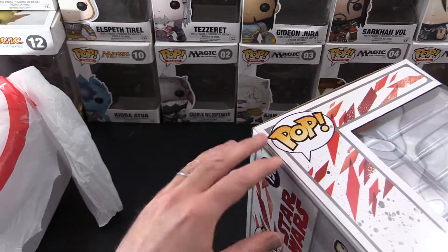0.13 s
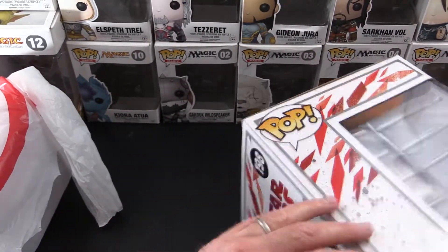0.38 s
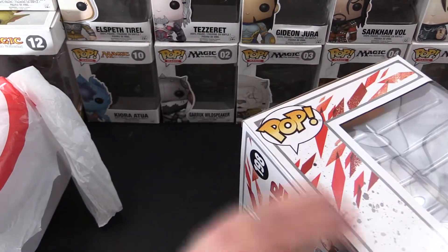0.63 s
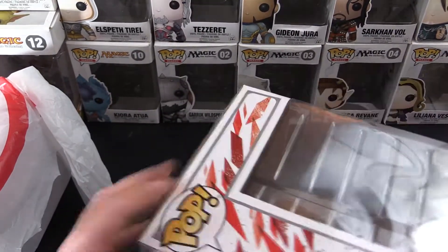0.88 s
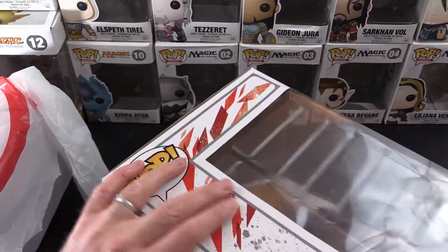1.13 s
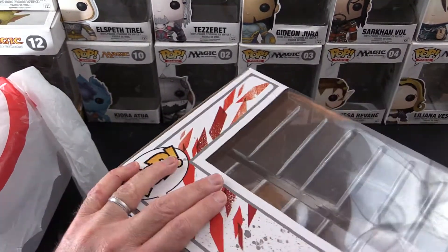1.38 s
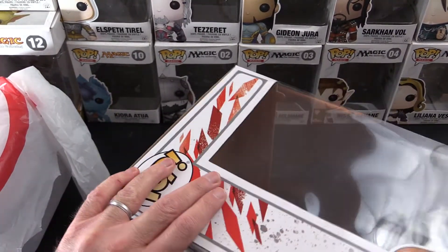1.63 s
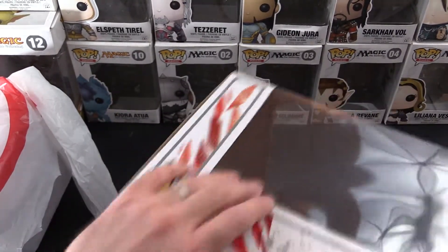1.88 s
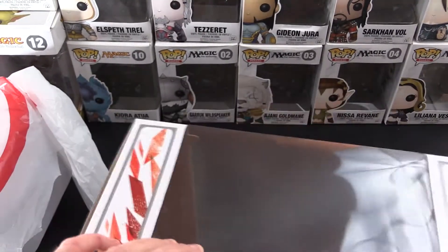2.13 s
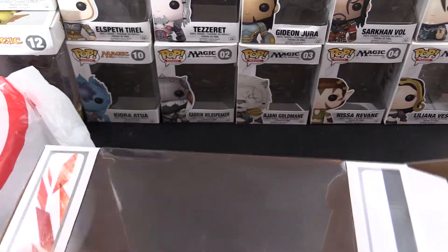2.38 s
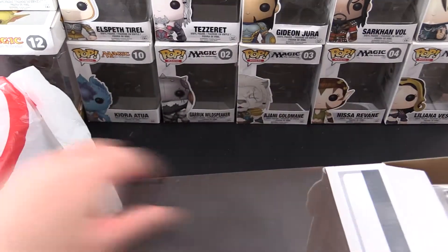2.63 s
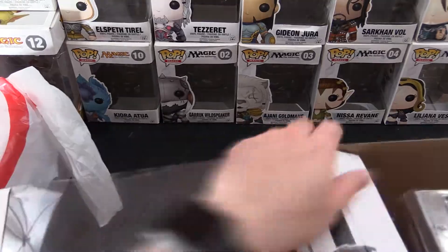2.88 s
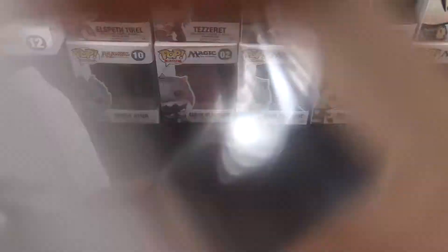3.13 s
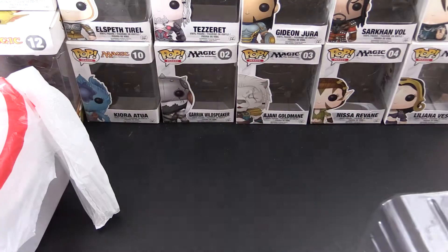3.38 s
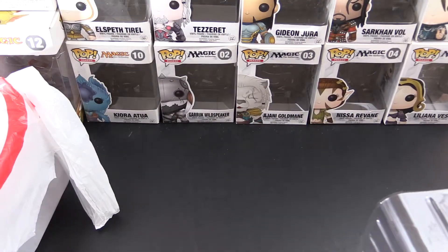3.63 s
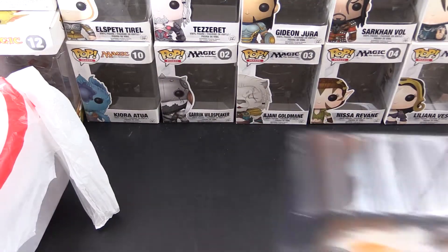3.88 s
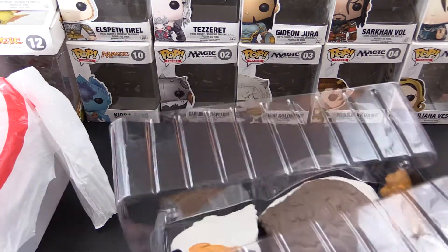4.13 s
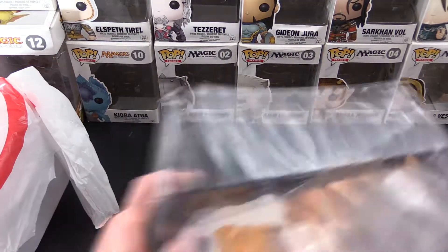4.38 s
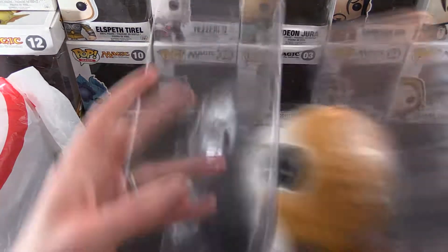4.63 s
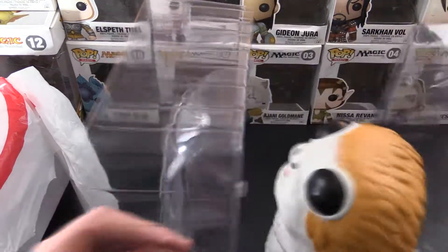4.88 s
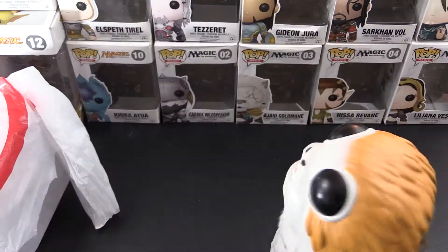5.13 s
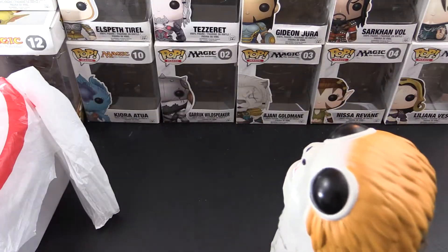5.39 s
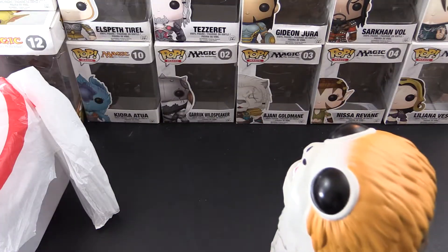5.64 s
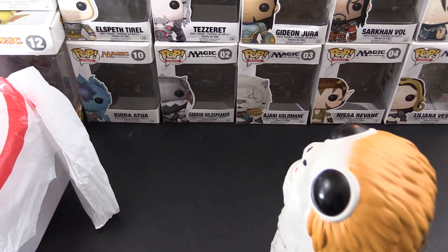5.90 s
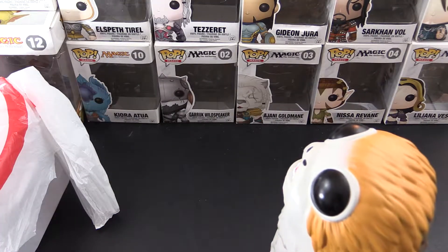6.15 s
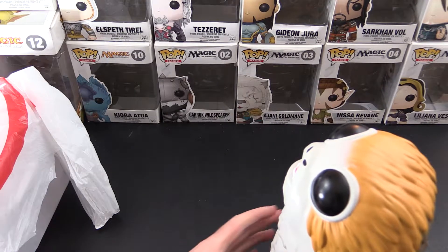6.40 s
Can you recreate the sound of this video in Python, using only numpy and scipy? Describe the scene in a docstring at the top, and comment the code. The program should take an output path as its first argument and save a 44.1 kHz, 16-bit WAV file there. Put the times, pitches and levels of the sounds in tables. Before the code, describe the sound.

Close up in a small quiet room, hands work a hollow cardboard box and thin clear plastic on a table. Light crinkles grow into loud crackles, scrapes and boxy knocks, ease briefly, then the plastic tray rattles and snaps sharply. A few small ticks and one crisp knock follow, leaving faint hiss and hum.

```python
"""Thin plastic crinkles and hollow cardboard rubs and knocks: a box and its clear tray handled on a table, heard
speeded up. Each short snatch is grainy friction noise rung at its own pitch and faded in and out; plastic adds
hiss and sudden snaps, cardboard adds a clear note, and the table adds dull thuds.
Underneath are the slide of the tray and box, as steady friction noise, and a faint room hiss and hum."""
import sys
import numpy as np
from scipy import signal
from scipy.fft import rfft, irfft, next_fast_len
from scipy.io import wavfile

SR = 44100
rng = np.random.default_rng(int(sys.argv[2]) if len(sys.argv) > 2 else 0)


def nominal_scale(level):
    """Amplitude ratio for a level in decibels (scalar or array-like)."""
    x = np.asarray(level, float) / 20
    return 10 ** x


def generate_wav(signal):
    """Clip the signal to [-1, 1] and save it as 16-bit WAV at the path in sys.argv[1]."""
    frames = np.transpose(np.atleast_2d(signal))
    scaled = np.clip(frames, -1, 1) * 32767
    pcm = np.round(scaled).astype(np.int16)
    wavfile.write(sys.argv[1], SR, pcm)


N = 287566   # samples, about 6.5 s

# Colour of the friction before each material rings. Each row: frequency in Hz, relative density in dB per Hz.
FRICTION_COLOUR = [(18, -56), (30, -6), (233, 2.5), (512, -3.5), (822, -7), (988, -8.5), (1860, -11),
                   (2010, -11.5), (3580, -16), (10200, -29.5), (16000, -41.5)]
# Sudden snaps and taps of the plastic. Each row: start in seconds, starting level in dB, ring in Hz.
SNAP_EVENTS = [(0.323,-38,1800),(.604,-30,2200),(.95,-48,3500),(1.094,-20.5,754),(1.276,-24,730),(1.303,-29,910),(1.374,-30.5,1730),(1.516,-32.5,720),(1.804,-32,800),(2.394,-31,950),(2.762,-24.5,1210),(2.988,-28.5,1760),(3.234,-30,1920),(3.323,-31.5,766),(3.964,-22.5,940),(4.147,-54,2500),(4.22,-38,617),(4.337,-41.5,990),(4.451,-34,1350),(4.517,-28,1360),(4.606,-22,910),(4.659,-30,1800),(5.117,-20,830),(5.464,-60,1510),(5.628,-29,780),(5.73,-39,627),(5.929,-41,776)]
RISE_SHARE = 0.51   # share of a snatch's length spent fading in


def at_hz(points, hz):
    """Reads a spectrum curve between its points on a logarithmic frequency scale."""
    point_hz, value = np.transpose(points)
    return np.interp(np.log(hz + 1), np.log(point_hz), value)


def rms_one(x):
    """Brings the whole signal to an rms of 1."""
    return x / np.sqrt(np.mean(x ** 2) + 1e-20)


def in_time(rows):
    """Draws straight lines through timed rows, giving one curve for each column after the seconds."""
    s, *columns = np.transpose(rows)
    return [np.interp(np.arange(N) / SR, s, c) for c in columns]


def band(x, low_hz, high_hz):
    """Keeps one frequency band and levels it to rms 1."""
    sos = signal.butter(3, [low_hz, high_hz], "band", fs=SR, output="sos")
    return rms_one(signal.sosfilt(sos, x))


def resonate(x, hz, width_hz):
    """One damped mode: a two-pole resonator; the wider it is, the sooner it dies away."""
    r = np.exp(-np.pi * width_hz / SR)
    poles = [1, -2 * r * np.cos(2 * np.pi * hz / SR), r * r]
    return signal.lfilter([1, 0, -1], poles, x) * (1 - r * r) / 2


def grains(per_s, uneven_db, smooth):
    """Tiny buckling clicks of uneven size over smooth friction noise, as two unrelated streams."""
    excess = np.minimum(rng.exponential(1, (2, N)), 4)
    sizes = nominal_scale(uneven_db * excess) * rng.choice([-1, 1], (2, N))
    clicks = rms_one(sizes * (rng.random((2, N)) < per_s / SR))
    return clicks + smooth * rng.standard_normal((2, N))


def coloured(streams, spectrum):
    """Gives two streams a spectrum and mixes them as mid and side by the left-right likeness."""
    # How alike left and right are. Each row: frequency in Hz, likeness (0 unrelated, 1 the same).
    likeness = [(60, 1), (95, 0.86), (150, 0.96), (240, 0.98), (380, 0.95), (600, 0.84), (950, 0.46),
                (1500, 0.56), (2380, 0.54), (3770, 0.44), (5980, 0.44), (9470, 0.76), (15000, 0.88)]
    size = next_fast_len(N)
    hz = np.arange(size // 2 + 1) * SR / size
    alike = np.clip(at_hz(likeness, hz), 0, 1)
    mid, side = rfft(streams, size) * nominal_scale(at_hz(spectrum, hz))
    mid, side = np.sqrt(1 + alike) * mid, np.sqrt(1 - alike) * side
    return rms_one(irfft([mid + side, mid - side], size)[:, :N])


def room_tone():
    """Steady noise whose spectrum holds the low hum and faint hiss of a small quiet room."""
    # Colour of the quiet room. Each row: frequency in Hz, relative density in dB per Hz.
    room_colour = [(18, -24), (30, -16.5), (118, -1.5), (153, -15), (252, -12), (311, -30), (364, -14.5),
                   (499, -26.5), (988, -19.5), (6720, -36), (7870, -36), (11400, -42.5), (16000, -51)]
    return nominal_scale(-57) * coloured(rng.standard_normal((2, N)), room_colour)


def ramps(s, in_ms, out_ms, curve):
    """Samples of one snatch and its fade up to s and down again; a snap on the way up sets the sound off."""
    start, end = s - max(in_ms, 1) / 1000, s + max(out_ms, 1) / 1000
    run_in = 600   # silent samples in which the filters settle
    i = np.arange(max(0, int(start * SR) - run_in), min(N, int(end * SR)))
    fade = np.interp(i / SR, [start, s, end], [0, 1, 0]) ** curve
    for snap_s, _, _ in SNAP_EVENTS:
        if s - .015 < snap_s < s + .001:
            fade[i < snap_s * SR] *= 0.3   # hushed until the snap
    return i, fade


def rustles(slide_db, low_hz, high_hz):
    """Small snatches at chance moments, near the slide in level: (s, length ms, dB, Hz)."""
    per_s, below_slide_db, spread_db, mean_ms = 9, 2.5, 1, 136
    when, size, pitch, span = rng.random((per_s * N // SR, 4)).T
    db = slide_db[(when * N).astype(int)] - below_slide_db + spread_db * (1 - 2 * size)
    hz = low_hz * (high_hz / low_hz) ** pitch
    return list(zip(when * N / SR, mean_ms * (.5 + span), db, hz))


def ringing(x, hz, width_hz, focus, detune, cycles, stray):
    """Friction rings round one pitch, and in narrow chance modes scattered about it; rms 1."""
    ring = x + focus * resonate(x, hz, width_hz)
    for mode_hz in np.clip(hz * np.exp(detune), 100, 12000):
        ring = ring + stray * resonate(x, mode_hz, mode_hz / cycles)
    return rms_one(ring)


def table_thuds(friction):
    """The table top thuds: low friction noise through two equal broad resonances in a row."""
    # Dull thuds through the table top. Each row: peak in seconds, level in dB, pitch in Hz.
    thud_events = [(.175,-51,70.5),(.438,-41,115),(.478,-39,159),(.707,-46.5,114),(.978,-46.5,158),(1.633,-27.5,142),(1.858,-40.5,133),(2.168,-46.5,113),(2.265,-34,154),(2.409,-41,115),(2.637,-43,115),(2.903,-42,110),(3.26,-41,121),(3.344,-41,159),(4.118,-47,157),(4.578,-39,161),(5.144,-39.5,108),(5.15,-46,55)]
    low = band(friction, 38, 200)
    out = np.zeros((2, N))
    for s, db, hz in thud_events:
        i, fade = ramps(s, in_ms=54.0, out_ms=42.0, curve=0.73)
        once = resonate(low[:, i], hz, hz / 2.3)
        out[:, i] += fade * nominal_scale(db) * rms_one(resonate(once, hz, hz / 2.3))
    return out


def cardboard(slide_db):
    """The hollow box drums at its modes, one note standing out in each snatch; the table thuds."""
    # Hollow rubs and knocks. Each row: peak in seconds, length in ms, level in dB, clearest note in Hz.
    rumbles = [(.011,39,-35.5,500),(.106,63,-35,302),(.162,88,-40.5,436),(.332,92,-34,880),(.423,160,-35.5,256),(.471,66,-29.5,434),(.56,220,-44.5,610),(.625,114,-37.5,230),(.808,58,-33,266),(.872,160,-41.5,255),(.922,60,-38.5,590),(.967,110,-38.5,325),(1.066,84,-39.5,415),(1.105,39,-28,710),(1.143,67,-25,318),(1.227,140,-36,273),(1.268,130,-37,260),(1.307,72,-30.5,356),(1.384,58,-25,365),(1.449,55,-30,305),(1.545,86,-23,745),(1.583,73,-31,248),(1.63,195,-18.5,573),(1.744,60,-28.5,315),(1.829,87,-24.5,810),(1.873,65,-29.5,306),(1.92,105,-35,310),(1.97,110,-42.5,300),(2.02,100,-42,830),(2.143,77,-38,209),(2.182,160,-44,524),(2.255,58,-22.5,244),(2.301,43,-29,362),(2.4,50,-24,259),(2.472,95,-29,362),(2.576,47,-39.5,194),(2.63,84,-35,772),(2.686,47,-31.5,967),(2.774,85,-28,240),(2.832,73,-27.5,258),(2.889,75,-29,264),(2.948,110,-41,257),(3.004,88,-32,373),(3.057,75,-36.5,388),(3.097,87,-41.4,400),(3.255,81,-30,239),(3.329,52,-23,195),(3.491,56,-48.5,390),(3.582,36,-43.5,383),(3.615,41,-40,390),(3.773,71,-39.5,360),(3.845,240,-46.5,360),(3.931,81,-43,262),(3.973,130,-35,905),(4.056,120,-39,420),(4.106,73,-30.5,319),(4.221,40,-38.5,289),(4.264,30,-36.5,412),(4.345,53,-35.5,383),(4.384,79,-37,397),(4.424,69,-32,390),(4.554,137,-23,888),(4.614,42,-30,830),(4.671,58,-19,382),(4.715,77,-23.5,424),(4.788,51,-33,830),(4.876,80,-43,745),(4.927,122,-43,222),(4.96,45,-38,576),(4.992,59,-39.5,700),(5.046,73,-40,460),(5.09,53,-50,230),(5.13,120,-26.5,450),(5.314,38,-42,530),(5.575,70,-42.5,684),(5.638,75,-33,311),(5.75,73,-38,206.4),(5.94,78,-28,414),(6.0,133,-40,830),(6.48,128,-52.5,256)]
    # Air and panel modes of the box. Each row: pitch in Hz, width in Hz, gain in dB.
    box_modes = [(254, 80, -3.5), (390, 160, -4.5), (610, 54, -2), (830, 190, -5)]
    friction = coloured(grains(per_s=400.0, uneven_db=4.0, smooth=1.0), FRICTION_COLOUR)
    modes = sum(nominal_scale(db) * resonate(friction, hz, width_hz) for hz, width_hz, db in box_modes)
    drum = band(friction + modes, 124.0, 937)
    out = nominal_scale(slide_db) * drum[:, ::-1]   # slide: the noise backwards, so it is unlike the snatches
    rows = rumbles + rustles(slide_db, low_hz=230, high_hz=580)
    for (s, ms, db, note_hz), chance in zip(rows, rng.standard_normal((len(rows), 2))):
        i, fade = ramps(s, RISE_SHARE * ms, (1 - RISE_SHARE) * ms, curve=1.605)
        drum_hz = 424 * (note_hz / 400) ** 0.36   # drumming follows the note only in part
        ring = ringing(drum[:, i], drum_hz, drum_hz / 2.0, focus=0.41, detune=0.314 * chance,
                       cycles=14.0, stray=2.1)
        note = rms_one(resonate(friction[:, i], note_hz, note_hz / 20.0))
        out[:, i] += fade * nominal_scale(db) * rms_one(ring + 0.68 * note)
    return out + table_thuds(friction)


def plastic_snaps(friction):
    """The sheet snaps: bright noise rung at one pitch, starting at once and dying away exponentially."""
    t60_s = 0.069   # time to fall by 60 dB
    brittle = band(friction, 255, 18400)
    out = np.zeros((2, N))
    for s, db, hz in SNAP_EVENTS:
        i = np.arange(int(s * SR), min(N, int((s + 0.26) * SR)))
        crack = brittle[:, i] + 27.0 * resonate(brittle[:, i], hz, hz / 5.6)
        fall_db = 60 * (i - i[0]) / SR / t60_s
        out[:, i] += nominal_scale(db - fall_db) * rms_one(crack)
    return out


def plastic(slide_db):
    """Thin stiff sheet: dense clicks, a mid ring that changes with every grip, hiss above, and snaps."""
    # Crinkles. Each row: peak in seconds, length in ms, ring level in dB, ring in Hz, hiss level in dB.
    crinkles = [(.016,69,-39.5,1210,-52),(.065,43,-44,784,-50.5),(.113,52,-40,3490,-45),(.172,50,-47.5,776,-64),(.341,69,-31.5,1850,-40),(.429,61,-42.5,2480,-48.5),(.467,50,-34,878,-49),(.569,40,-38.5,1690,-46.5),(.619,63.4,-25,2140,-34),(.713,52,-43.5,2180,-46),(.81,72,-45.5,790,-60),(.887,135,-43.5,4140,-43),(.92,50,-37.5,2860,-45),(.957,45,-37,1770,-39),(.988,59,-40.5,2040,-49),(1.06,160,-49.5,2000,-49.5),(1.099,23,-27.5,798,-70),(1.134,94,-32,784,-47),(1.208,78,-36.5,792,-45.5),(1.276,46,-30,1114,-45),(1.314,80,-30.5,1570,-45),(1.381,34,-31,1670,-38.5),(1.449,48,-36.5,1920,-46.5),(1.561,76,-19.5,1890,-25.5),(1.603,121,-20,3710,-25.5),(1.665,97,-23,830,-35),(1.749,33,-37,2420,-37.5),(1.814,130,-33,825,-45.5),(1.845,87,-31,790,-37),(1.935,120,-44,2110,-53.5),(2.008,140,-47.5,880,-60),(2.097,110,-46,925,-50),(2.156,88,-39.5,854,-59),(2.244,61,-22,830,-27),(2.398,65,-26.5,965,-36),(2.581,34,-39.5,884,-57.5),(2.625,63,-33.5,3040,-48.5),(2.68,38,-41,837,-71),(2.768,60,-30.5,1050,-40),(2.828,61,-32,1890,-52),(2.873,105,-38,1630,-43),(2.993,63,-36,1920,-48),(3.035,156,-57,1450,-58),(3.105,150,-47.5,960,-52),(3.182,54,-34,2500,-50),(3.267,65,-27.5,2380,-30),(3.325,63,-32,806,-43),(3.545,81,-55.5,2430,-60.5),(3.618,42,-52,814,-68),(3.76,56,-47.5,790,-75),(3.87,210,-48,870,-54.5),(3.922,88,-44,2010,-48.5),(3.976,38,-34.5,1160,-61),(3.99,120,-48,1490,-49.5),(4.065,85,-38.5,810,-45.5),(4.107,52,-32.5,780,-49.5),(4.15,50,-43,790,-52),(4.226,39,-47.5,820,-72),(4.272,53,-52,990,-71),(4.341,36,-42,2580,-55),(4.382,75,-41.5,840,-51.5),(4.421,52,-34.5,830,-52),(4.461,89,-40.5,1310,-46),(4.524,53,-23.5,1370,-30.5),(4.562,53,-20.5,860,-32.5),(4.606,58,-26,930,-39),(4.667,65,-22,2170,-34.5),(4.71,105,-31.5,1880,-44),(4.778,62,-34,840,-43.5),(4.882,27,-36.5,1930,-45),(4.966,68,-37,1070,-44.5),(5.011,50,-34,3900,-33),(5.121,56,-23.5,900,-37.5),(5.162,89,-35,930,-44.5),(5.314,27,-43.5,1530,-51.5),(5.39,100,-56.5,1490,-66),(5.474,48,-43,1495,-46),(5.575,136,-48,810,-58.5),(5.636,76,-36.5,1920,-51),(5.74,106,-47,780,-62.5),(5.81,80,-53,1800,-62),(5.943,54.6,-22,1016,-32),(5.995,106,-36.5,1780,-47.5),(6.156,38,-70,1060,-61),(6.487,140,-60.5,2090,-61)]
    # Brightness of the hiss. Each row: time in seconds, gain in dB above 9 kHz before each snatch is levelled.
    sparkle = [(0, 9.5), (.7, 4.5), (1.3, 2.5), (1.7, 1), (2.3, 3.5), (3, 3), (4, 4), (4.7, 1), (5.3, -2),
               (6.5, 5.5)]
    friction = coloured(grains(per_s=2500.0, uneven_db=0.0, smooth=1.02), FRICTION_COLOUR)
    # fewer, larger folds
    buckling = coloured(grains(per_s=1100.0, uneven_db=3.0, smooth=1.0), FRICTION_COLOUR)
    sheet, hiss = band(buckling, 733, 3840), band(friction, 3160, 14800)
    below = signal.sosfilt(signal.butter(3, 9000, "low", fs=SR, output="sos"), hiss)
    top = signal.sosfilt(signal.butter(3, 9000, "high", fs=SR, output="sos"), hiss)
    hiss = below + nominal_scale(in_time(sparkle)) * top
    out = nominal_scale(slide_db) * band(friction[:, ::-1], 570, 13000)   # slide: the noise backwards
    small = rustles(slide_db, low_hz=780, high_hz=2500)
    rows = crinkles + [row + (row[2] - 12.0,) for row in small]   # their hiss is 12 dB under the ring
    for (s, ms, db, hz, hiss_db), chance in zip(rows, rng.standard_normal((len(rows), 4))):
        i, fade = ramps(s, RISE_SHARE * ms, (1 - RISE_SHARE) * ms, curve=1.018)
        dull = np.exp(-2 * np.pi * 5.0 * hz / SR)   # large folds ring low and carry little treble
        fold = signal.lfilter([1 - dull], [1, -dull], sheet[:, i])
        ring = ringing(fold, hz, hz / 17.5, focus=2.0, detune=.6 * chance, cycles=30.0, stray=1.8)
        fizz = ringing(hiss[:, i], 5990, 3000, focus=0.15, detune=.35 * chance, cycles=80.0, stray=1.0)
        out[:, i] += fade * nominal_scale(db) * ring
        out[:, i] += fade ** 1.1 * nominal_scale(hiss_db) * fizz   # treble is briefer
    return out + plastic_snaps(friction)


def scene():
    """Plastic and box move with the hands; the room stays."""
    # Steady sliding under the snatches. Each row: time in seconds, cardboard level in dB, plastic level in dB.
    slide = [(0,-40,-46),(.2,-53.5,-61.5),(.56,-50,-47),(.78,-61,-61.5),(1.05,-46.5,-54.5),(1.72,-43.5,-40),(1.92,-51,-68),(2.27,-40,-40),(2.55,-51,-58.5),(2.92,-51,-52.5),(3.19,-51,-50.5),(3.32,-42,-71),(3.45,-62.5,-68.5),(3.7,-56.5,-58.5),(4.0,-51,-44),(4.2,-51.5,-67.5),(4.57,-37.5,-42),(5.06,-58,-51),(5.27,-60,-58.5),(6.52,-67,-83)]
    # Where the hands are. Each row: time in seconds, plastic's left over right in dB, plastic's side gain in dB.
    place = [(0.0, -3.0, -1), (2.85, -3.0, -2), (2.91, 0.0, 1), (2.98, -5, -3.5), (3.32, 4, 1.5),
             (3.96, -3, -3), (4.34, -1.5, -6), (5.03, -2, -2), (5.14, 1, 0), (5.17, -2, -1), (5.27, 0, 0),
             (6.52, 0.5, 1)]
    box_db, sheet_db = in_time(slide)
    pan_db, spread_db = in_time(place)
    left, right = plastic(sheet_db)
    side = nominal_scale(spread_db) * (left - right) / 2
    sheet = (left + right) / 2 + side * [[1], [-1]]
    sheet = sheet * nominal_scale(pan_db * [[.5], [-.5]])
    box = cardboard(box_db) * nominal_scale(0.24 * pan_db * [[.5], [-.5]])   # long waves reach both sides alike
    return sheet + box + room_tone()


def band_limit(x):
    """A steep low-pass at the top of the band."""
    return signal.sosfilt(signal.butter(12, 16480, fs=SR, output="sos"), x)


def record(dry):
    """The recorder cuts the top steeply, 60 dB down from 16350 Hz."""
    top_cut = signal.cheby2(12, 60, 16350, fs=SR, output="sos")
    mix = signal.sosfilt(top_cut, dry)
    return band_limit(mix)


dry = scene()
out = record(dry)
generate_wav(out)
```